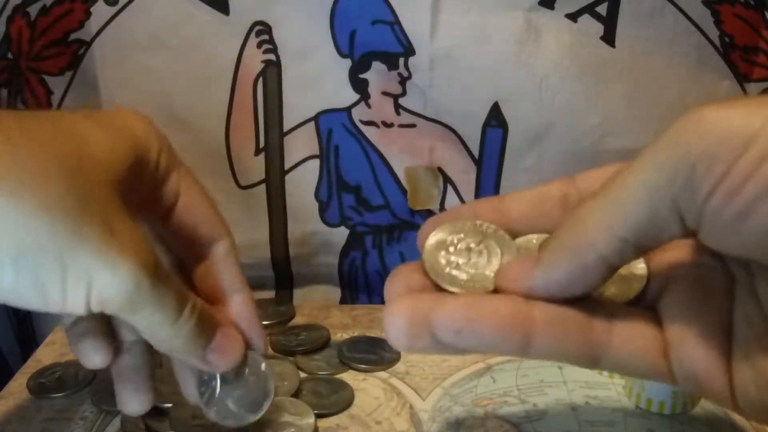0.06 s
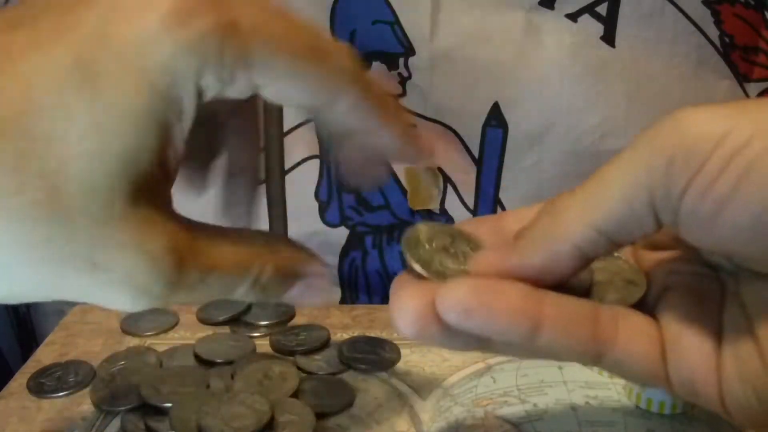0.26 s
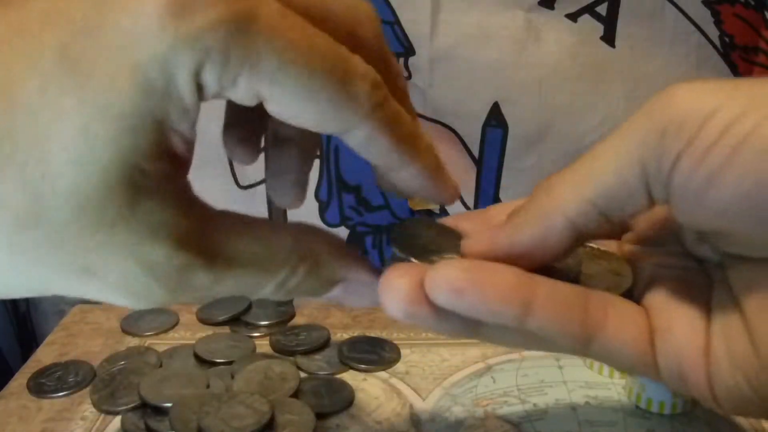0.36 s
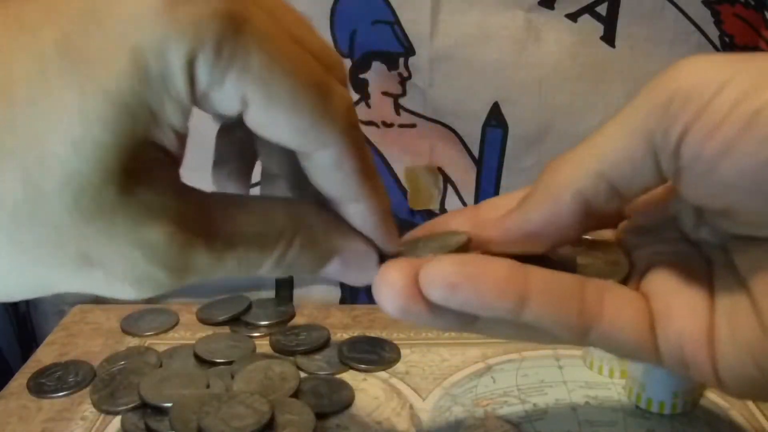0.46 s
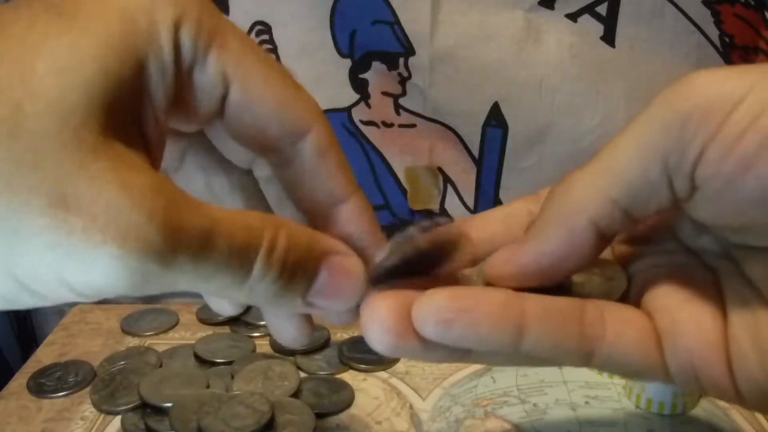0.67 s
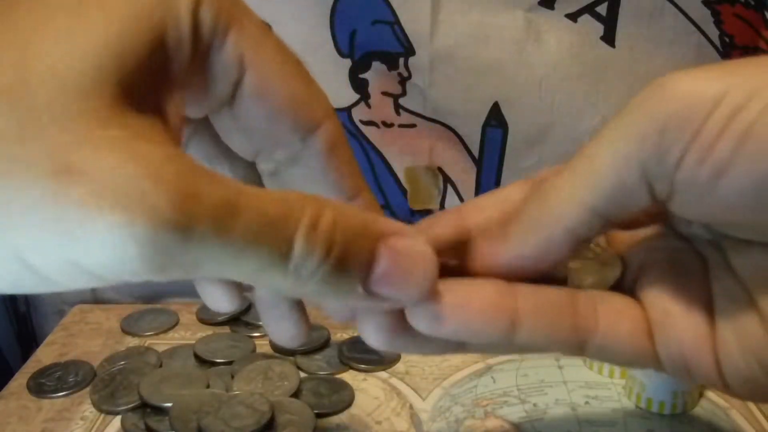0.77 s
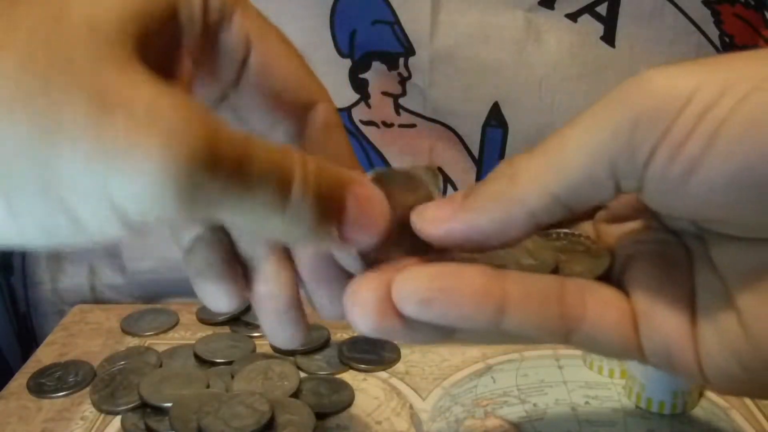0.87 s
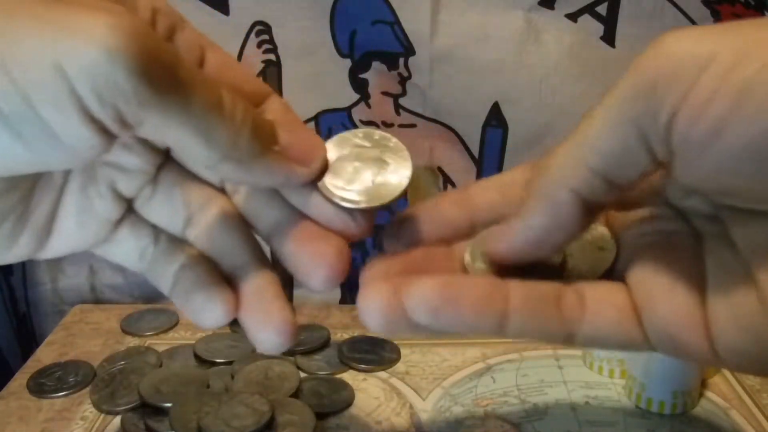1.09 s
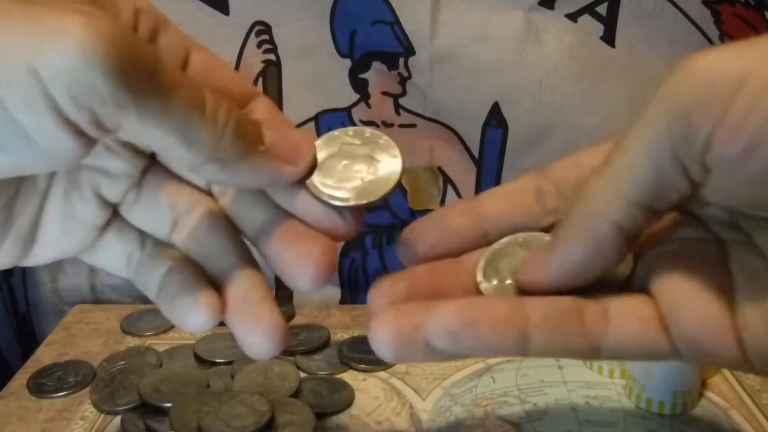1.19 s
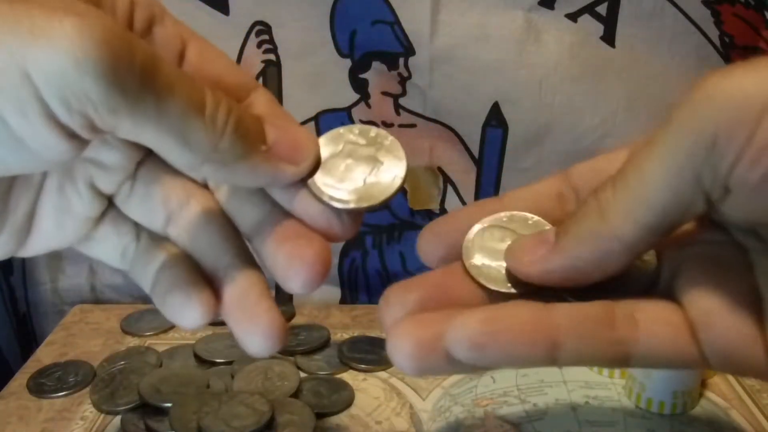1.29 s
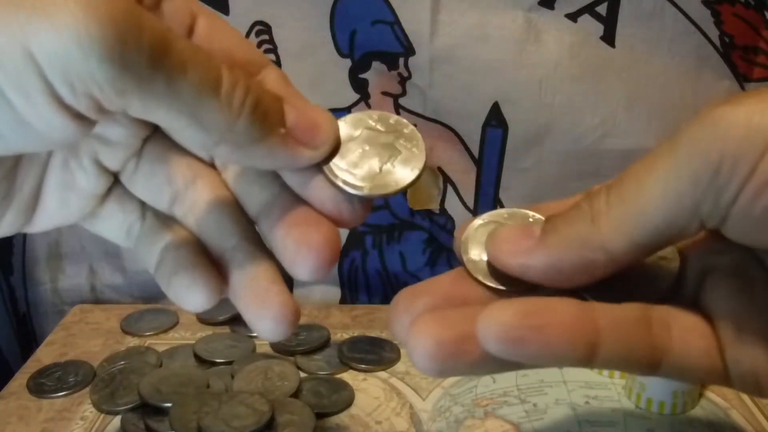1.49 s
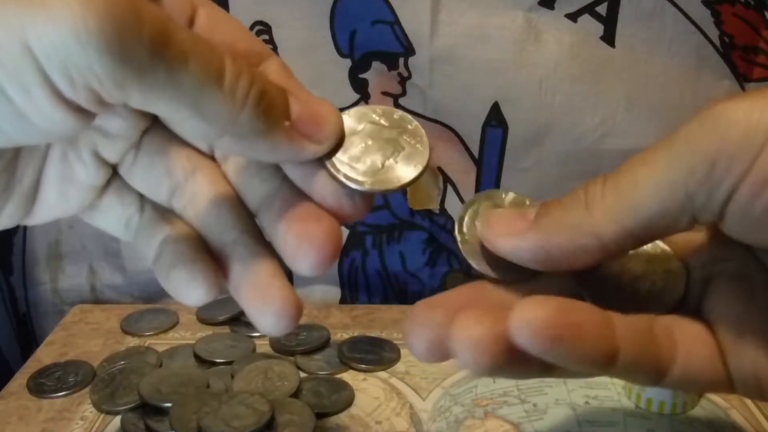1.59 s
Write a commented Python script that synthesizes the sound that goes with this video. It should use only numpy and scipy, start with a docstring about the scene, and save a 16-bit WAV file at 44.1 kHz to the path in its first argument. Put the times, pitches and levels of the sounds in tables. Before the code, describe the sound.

Close up in a small quiet room, a metal coin clatters onto other coins, thudding on the wooden table and leaving a short high ring. After a lull, coins held in a hand scrape and click together, muted by skin.

```python
"""A coin drops on a pile of coins on a wooden table: it strikes, hops, clatters and rings out.
Each blow rattles the pile, rings its modes and thuds on the wood; heavy landings flex the table top.
Then big coins in the palm tick, slide over each other and clap together, damped by the skin.
Close microphone, small quiet room."""
import sys
import numpy as np
from scipy import signal
from scipy.fft import rfft, irfft
from scipy.io import wavfile

SR = 44100
rng = np.random.default_rng(int(sys.argv[2]) if len(sys.argv) > 2 else 0)


def store_pcm(level_fs):
    """Save levels as 16-bit WAV."""
    pcm = np.round(np.clip(level_fs, -1, 1) * 32767).astype(np.int16)
    wavfile.write(sys.argv[1], SR, np.atleast_2d(pcm).T)


N = 72765
T = np.arange(N) / SR


def undb(db):
    """Decibels to gain."""
    return 10 ** (np.asarray(db) / 20)


def fade(t60_s):
    """Exponential decay."""
    return np.exp(-np.log(1000) * T / t60_s)


def add(out, time_s, x):
    """Mix x in from time_s."""
    start = int(time_s * SR)
    out[start:] += x[:N - start]


def colour(x, spectrum):
    """Minimum-phase filter from (Hz, dB) points; keeps the power of white noise."""
    hz, db = np.array(spectrum).T
    bins_hz = np.maximum(np.fft.rfftfreq(2 * N, 1 / SR), 1)
    gain = undb(np.interp(np.log(bins_hz), np.log(hz), db))
    gain /= np.sqrt(np.mean(gain ** 2))
    cepstrum = irfft(np.log(gain))[:N]
    cepstrum[1:] *= 2
    return irfft(rfft(x, 2 * N) * np.exp(rfft(cepstrum, 2 * N)))[:N]


def ring(modes, detune=0):
    """Decaying modes, random phase; detune is the relative pitch scatter per blow."""
    out = np.zeros(N)
    for hz, db, t60_s in modes:
        pitch_hz = hz * (1 + detune * rng.standard_normal())
        out += undb(db) * fade(t60_s) * np.sin(2 * np.pi * (pitch_hz * T + rng.random()))
    return out


def burst(t60_s, tail_db, tail_t60_s):
    """Noise crack with a longer tail."""
    return rng.standard_normal(N) * (fade(t60_s) + undb(tail_db) * fade(tail_t60_s))


def resonate(x, hz, width_hz=1040):
    """Damped resonance with moving pitch; unit rms."""
    carrier = np.exp(2j * np.pi * np.cumsum(hz) / SR)
    baseband = signal.lfilter(*signal.butter(2, width_hz / 2, fs=SR), x / carrier)
    band = (carrier * baseband).real
    return band / band.std()


# room air (frequency [Hz], density [dB])
AIR_SPECTRUM = [(20, -3), (30, -1.5), (40, 6), (52, -2.5), (86, -1), (120, -8.5), (158, -2), (190, -8),
                (250, -10.5), (400, -16), (600, -16), (950, -19.5), (1300, -12), (1600, -18), (2200, -24.5),
                (13500, -31), (16000, -33)]


def air(level_db=-52):
    """Steady low noise of the room."""
    return undb(level_db) * colour(rng.standard_normal(N), AIR_SPECTRUM)


def room(x, wet_db=-14, t60_s=0.08, delay_s=0.0023):
    """Direct sound plus a short wash of reflections from table and backdrop."""
    tail = rng.standard_normal(N) * fade(t60_s) * (T > delay_s)
    return x + undb(wet_db) * signal.fftconvolve(x, tail / np.linalg.norm(tail))[:N]


# coin-on-coin noise, for slides and ticks (frequency [Hz], density [dB])
CONTACT_SPECTRUM = [(1200, -24), (2100, -17.5), (2600, -6), (4000, -2), (5600, 7), (6600, -1), (8600, -6),
                    (9500, -4.5), (11000, -2.5), (12700, -13.5), (13600, -15), (16000, -22)]
# slides (time [s], length [s], level [dB], start pitch [Hz], end pitch [Hz], overtone [dB], hiss [dB])
SLIDE_STROKES = [(0.024, 0.057, -56, 3960, 3700, -7, -2.5), (1.286, 0.041, -51, 4060, 3640, -18, 5.5),
                 (1.319, 0.037, -44.5, 3900, 4530, -15, -12), (1.36, 0.013, -48.5, 4530, 4300, -18, -14),
                 (1.369, 0.019, -41, 4620, 4300, -12, -13)]


def slides(ridges_per_s=8400, overtone_ratio=2.05):
    """Relief catches on relief: dense clicks ring the coin; pitch shifts with the overlap."""
    out = np.zeros(N)
    for time_s, length_s, db, start_hz, end_hz, overtone_db, hiss_db in SLIDE_STROKES:
        clicks = rng.standard_normal(N) * (rng.random(N) < ridges_per_s / SR)
        progress = np.minimum(T / length_s, 1)
        hz = start_hz + (end_hz - start_hz) * progress
        body = resonate(clicks, hz) + undb(overtone_db) * resonate(clicks, hz * overtone_ratio)
        hiss = undb(hiss_db) * colour(clicks / clicks.std(), CONTACT_SPECTRUM)
        pressure = np.sqrt(np.abs(np.sin(np.pi * progress)))
        add(out, time_s, undb(db) * pressure * (body + hiss))
    return out


# held coins meeting flat (time [s], length [s], level [dB], pitch [Hz])
FLAT_CLAPS = [(1.339, 0.0024, -23.5, 4230), (1.3894, 0.0023, -16, 4820), (1.391, 0.00354, -19.5, 4360)]


def claps(pitch_fall=0.094):
    """Two faces close: a falling chirp swells and is choked within milliseconds."""
    out = np.zeros(N)
    for time_s, length_s, db, hz in FLAT_CLAPS:
        progress = np.minimum(T / length_s, 1)
        chirp_hz = hz * (1 - pitch_fall * (progress - 0.5))
        phase = 2 * np.pi * np.cumsum(chirp_hz) / SR
        add(out, time_s, undb(db) * np.sin(np.pi * progress) ** 2 * np.sin(phase))
    return out


# middle modes of a held coin (frequency [Hz], level [dB], share of contact t60 [ratio])
HELD_MID_MODES = [(7350, -3, 0.66), (8150, 1.5, 0.54), (9920, -19.5, 0.36)]
# held-coin contacts (time [s], level [dB], pitch [Hz], middle modes [dB], top mode [dB], tick [dB], t60 [s])
HELD_CONTACTS = [(0.0435, -35, 6230, -10, -26, -15, 0.011), (0.06, -49.5, 6060, -8, -14, -0.5, 0.053),
                 (0.1276, -17, 6070, -21, -10, -6, 0.02), (0.1256, -30, 4520, -23, -21, -22, 0.066),
                 (0.5334, -31, 7080, -26, -5.5, -20, .024), (0.5332, -38.5, 6440, -24, -4.5, -11, 0.019),
                 (0.5375, -44.5, 5970, -8.5, 9, -5, 0.055), (.877, -56.5, 4670, 7, -10, 4.5, 0.023),
                 (1.2021, -49, 3820, 4.5, -12, -2, 0.023), (1.2609, -45.5, 3700, -13, -16, -5, 0.019),
                 (1.278, -41, 4140, 3.5, -16, -2, 0.021), (1.2866, -40.5, 3980, -1, -13, 0.5, 0.023),
                 (1.2947, -30.5, 7130, -1, -5, 0.5, 0.013), (1.3017, -34.5, 7040, -19, -20, -13, 0.034),
                 (1.308, -31.5, 7320, -10, -14, -5, 0.014), (1.3152, -36, 5700, -11, -18, 3, 0.019),
                 (1.335, -35, 4330, 1, -23, 5, 0.013), (1.3462, -30, 4090, -7, -26, -7, 0.013),
                 (1.3909, -20.5, 5480, 4, -10, -18, 0.0062), (1.3896, -30, 2460, -14, -13, 5, 0.007),
                 (1.394, -41, 4600, -8, 0, 1, 0.04)]


def touches(rise_s=0.00041, top_hz=12400, top_t60_s=0.021, tick_t60_share=0.79, grip_detune=0.0068):
    """Held coins meet: a tick and a ring that the skin detunes and damps."""
    rings, ticks = np.zeros((2, N))
    rise = np.minimum(T / rise_s, 1)
    for time_s, db, hz, mid_db, top_db, tick_db, t60_s in HELD_CONTACTS:
        upper_modes = [(top_hz, top_db, top_t60_s)]
        for mode_hz, mode_db, share in HELD_MID_MODES:
            upper_modes.append((mode_hz, mode_db + mid_db, share * t60_s))
        tone = ring([(hz, 0, t60_s)]) + ring(upper_modes, grip_detune)
        tick = rng.standard_normal(N) * fade(tick_t60_share * t60_s)
        add(rings, time_s, undb(db) * rise * tone)
        add(ticks, time_s, undb(db + tick_db) * rise * tick)
    return rings + colour(ticks, CONTACT_SPECTRUM)


# table-top modes (frequency [Hz], level [dB], t60 [s])
WOOD_MODES = [(178, -7.5, 0.12), (216, 4.5, 0.068), (267.5, -1, 0.19), (478, -13.5, 0.14), (671, -6, 0.12),
              (768, -2, 0.064), (883, -10.5, 0.18), (1108, -9, 0.13), (1440, 3, 0.05), (1574, -0.5, .055)]
# heavy landings (time [s], level [dB])
LANDINGS = [(0.1265, -27.5), (0.1823, -27.5), (0.2229, -36), (.302, -50.5)]


def table():
    """Heavy landings flex the table top: a hollow boom."""
    out = np.zeros(N)
    for time_s, db in LANDINGS:
        add(out, time_s, undb(db) * ring(WOOD_MODES))
    return out


# bounces that leave the top coin ringing (time [s], level [dB])
BOUNCES = [(0.197, -28), (.236, -25), (0.28, -29.5)]


def top_coin(hz=7208, t60_s=0.24, waver_db=4.5, waver_per_s=28):
    """One free mode, renewed at each bounce, outlasts the clatter and wavers as the coin wobbles."""
    envelope = np.zeros(N)
    for time_s, db in BOUNCES:
        blow = np.zeros(N)
        add(blow, time_s, undb(db) * fade(t60_s))
        envelope = np.maximum(envelope, blow)
    wobble = np.interp(T * waver_per_s, np.arange(N), rng.standard_normal(N))
    return envelope * undb(waver_db * wobble) * np.sin(2 * np.pi * hz * T)


# lowest two mode families of the piled coins (frequency [Hz], level [dB], t60 [s])
PILE_LOW_MODES = [(7110, -4, 0.039), (7170, -2, 0.069), (7370, -1.5, 0.058), (7510, -12, 0.11)]
PILE_HIGH_MODES = [(12110, -0.5, 0.085), (12240, 0, 0.13), (12440, -5, 0.092), (12680, -8, .04)]
# pile clatter and table thud (frequency [Hz], density [dB])
CLATTER_SPECTRUM = [(1000, -6), (2150, -12.5), (2900, -7), (3950, -9), (4500, -3), (6000, 0.5),
                    (6700, -4.5), (8300, 1), (9500, -6), (11000, -5.5), (12600, -8.5), (13600, -6.5),
                    (16000, -20)]
THUD_SPECTRUM = [(60, -39), (135, -26.5), (185, -1.5), (270, -0.5), (340, -7), (750, -6.5), (1600, -8.5),
                 (2100, -12.5), (5000, -27.5)]
# blows on the pile (time [s], clatter [dB], low ring [dB], high ring [dB], thud [dB])
PILE_BLOWS = [(0.1261, -21, -41, -20.5, -24.5), (.134, -39, -24, -44, -31.5), (.143, -27, -35, -27, -36),
              (.181, -25, -29, -24.5, -28.5), (0.1855, -18.5, -30, -22.5, -30),
              (0.1901, -23, -13.5, -28.5, -29), (.198, -27.5, -14, -22, -29.5),
              (0.2164, -26, -41, -25.5, -29), (0.2223, -25, -26.5, -31, -33),
              (0.235, -30.5, -31, -47, -35.5), (0.249, -36, -37, -50, -45), (0.264, -51, -38, -57, -49),
              (0.2843, -41.5, -44, -49, -64), (.319, -62, -56, -71, -58)]


def pile(contact_detune=0.002):
    """Each blow of the dropped coin rattles the pile, rings its coins and thuds on the wood."""
    clatter, thud, rings = np.zeros((3, N))
    for time_s, clatter_db, low_db, high_db, thud_db in PILE_BLOWS:
        add(clatter, time_s, undb(clatter_db) * burst(t60_s=0.019, tail_db=-8, tail_t60_s=0.2))
        add(thud, time_s, undb(thud_db) * burst(t60_s=0.028, tail_db=-12, tail_t60_s=0.32))
        add(rings, time_s, undb(low_db) * ring(PILE_LOW_MODES, contact_detune))
        add(rings, time_s, undb(high_db) * ring(PILE_HIGH_MODES, contact_detune))
    return colour(clatter, CLATTER_SPECTRUM) + colour(thud, THUD_SPECTRUM) + rings


def scene():
    """Contacts with reflections, top coin dry, over room air; mono."""
    contacts = pile() + table() + touches() + slides() + claps()
    return (room(contacts) + top_coin() + air())[None]


def record(dry, low_hz=26.8, top_hz=16000):
    """Band limit: cuts the deepest bass and the top."""
    highpass = signal.butter(4, low_hz, "high", fs=SR, output="sos")
    lowpass = signal.ellip(10, 0.2, 80, top_hz, fs=SR, output="sos")
    return signal.sosfilt(lowpass, signal.sosfilt(highpass, dry))


dry = scene()
out = record(dry)
store_pcm(out)
```